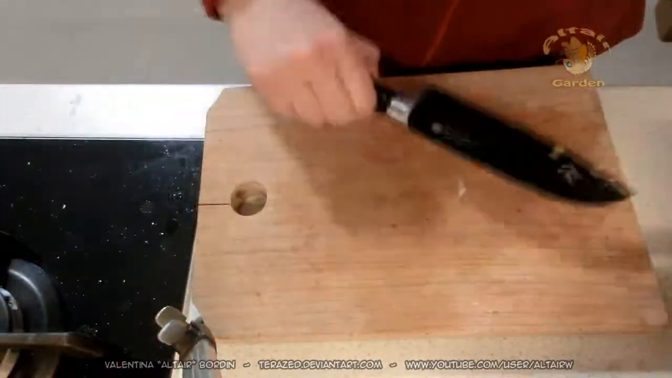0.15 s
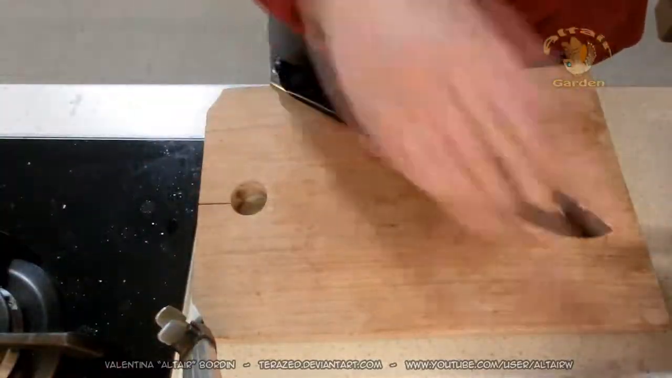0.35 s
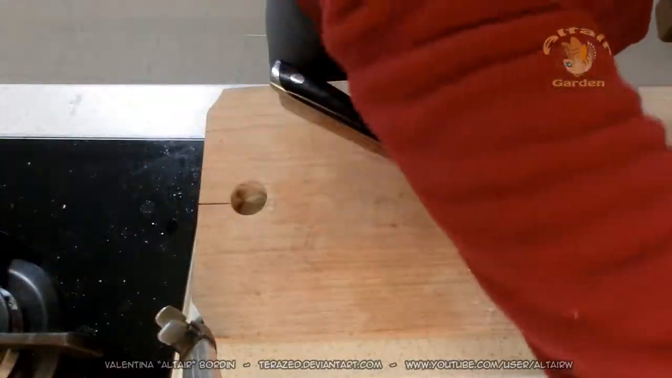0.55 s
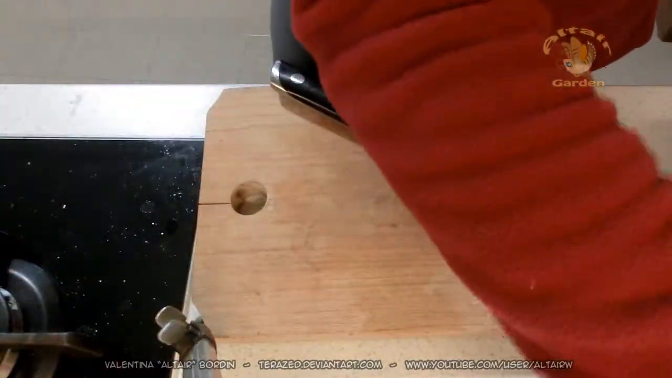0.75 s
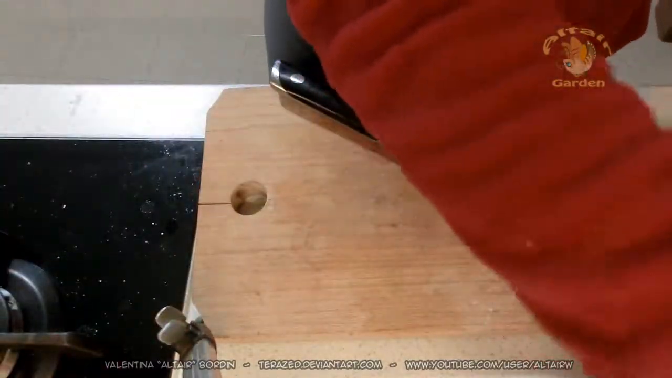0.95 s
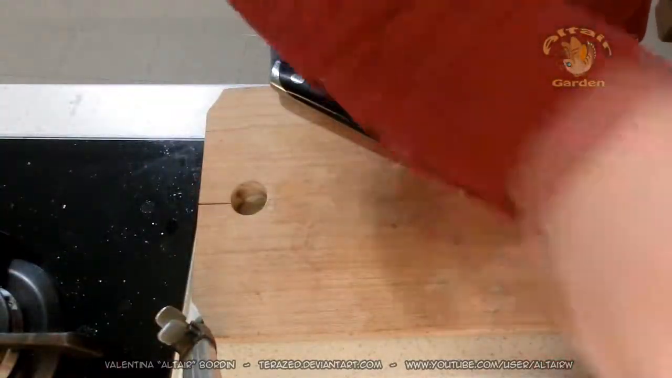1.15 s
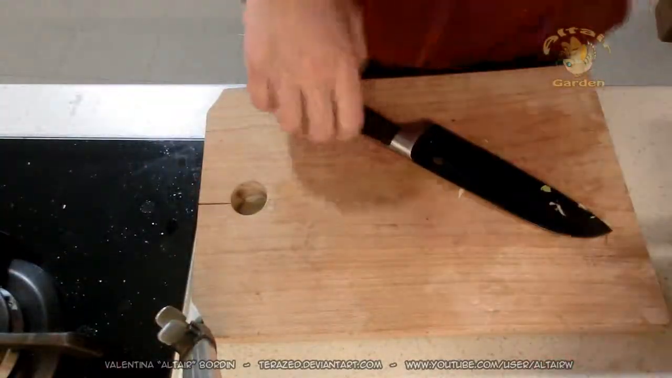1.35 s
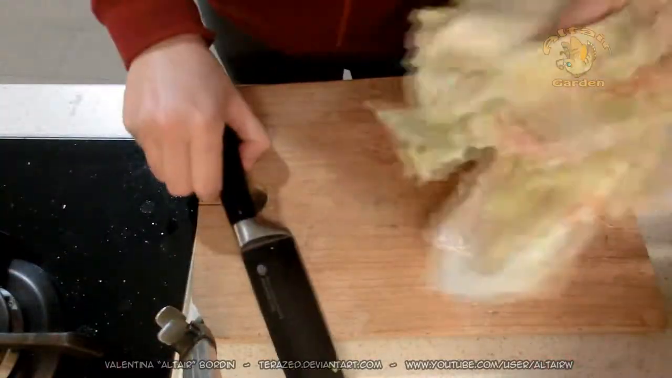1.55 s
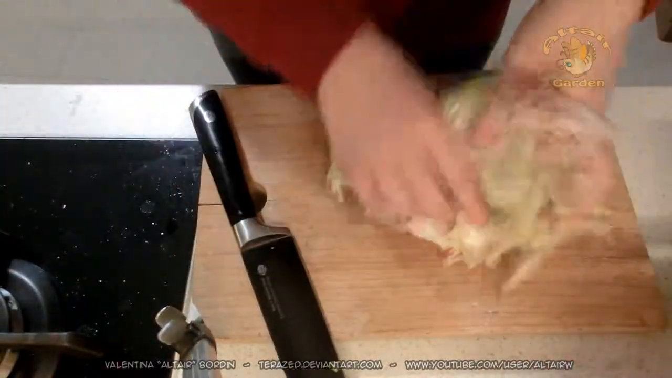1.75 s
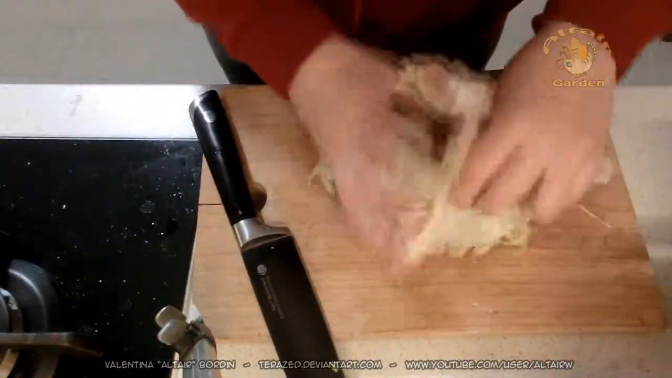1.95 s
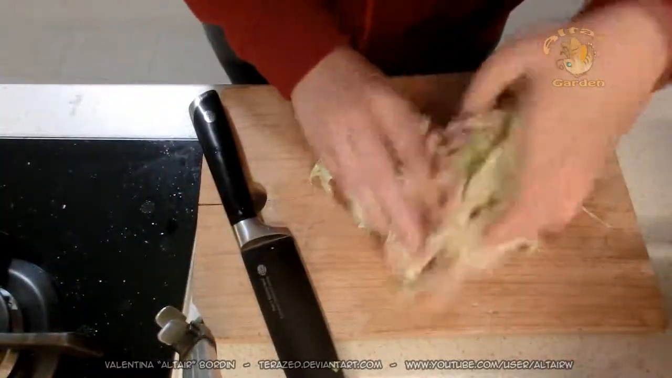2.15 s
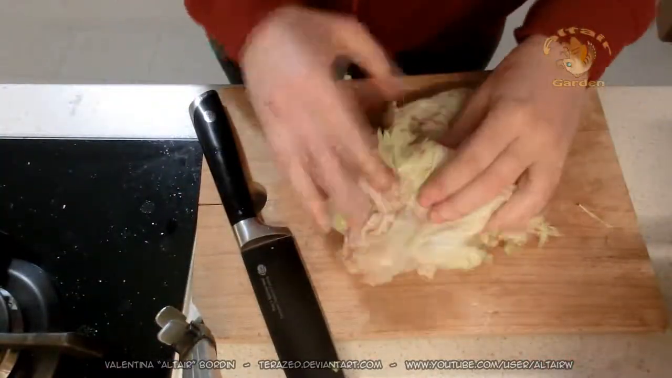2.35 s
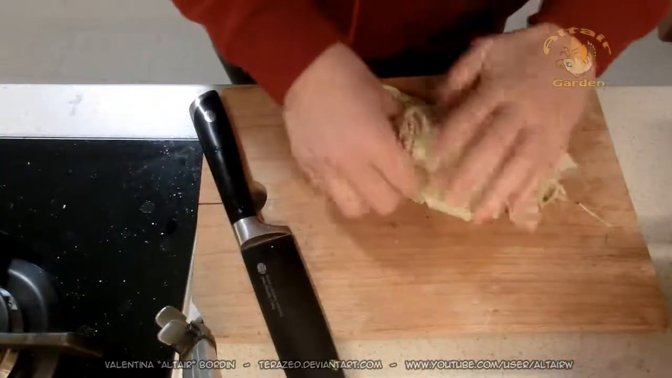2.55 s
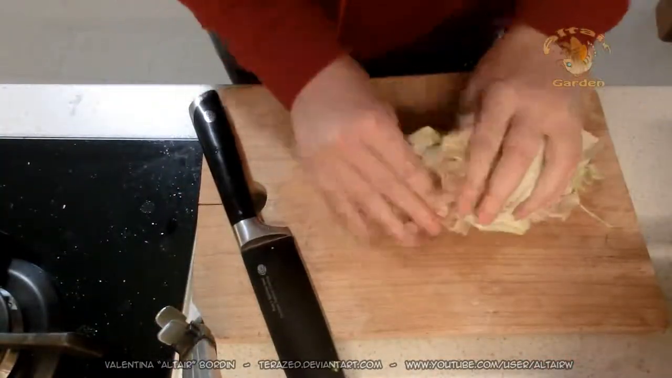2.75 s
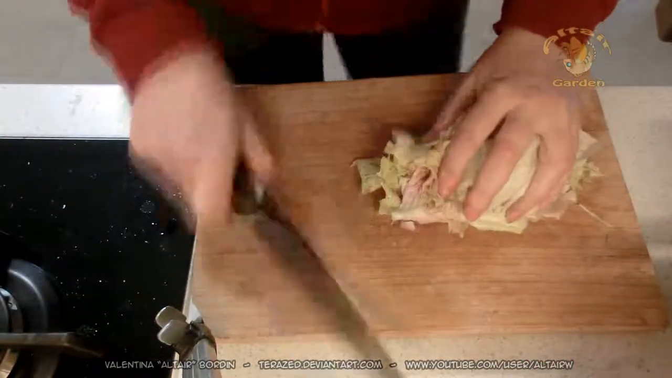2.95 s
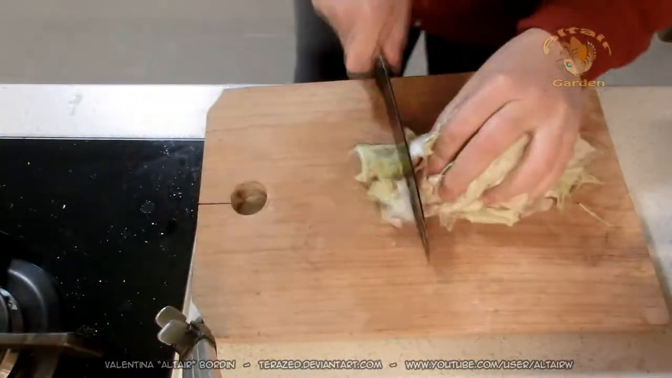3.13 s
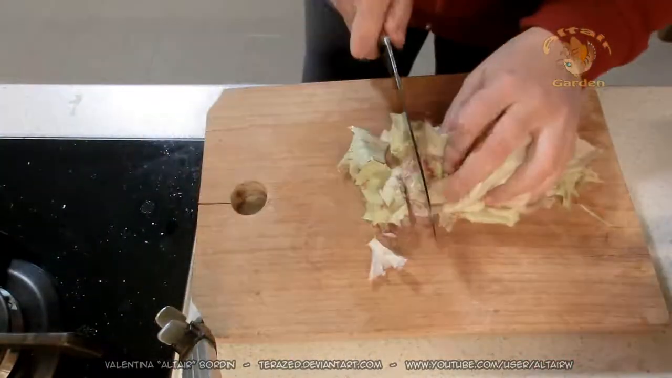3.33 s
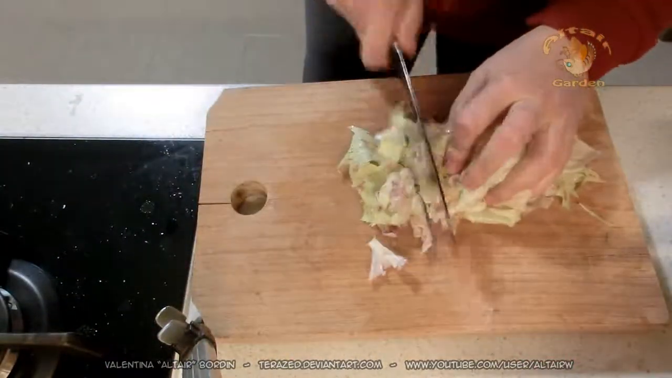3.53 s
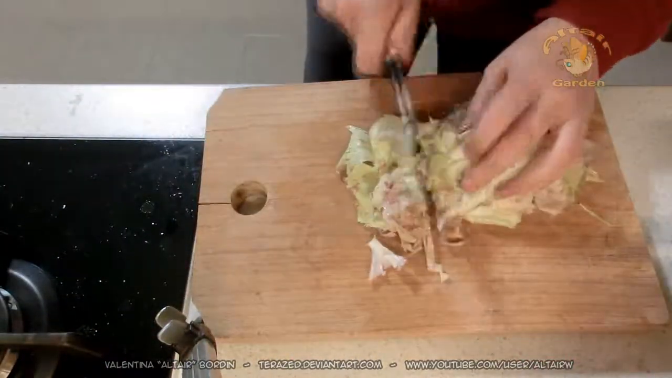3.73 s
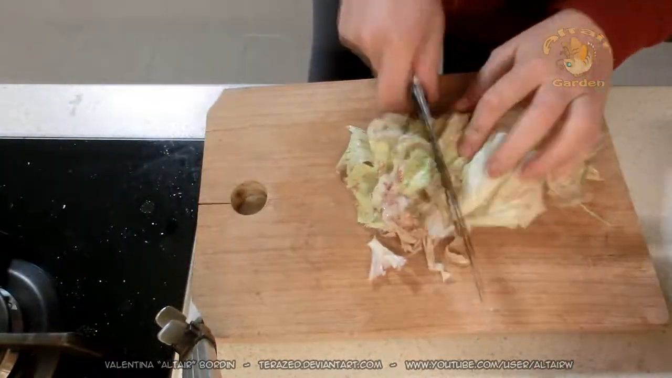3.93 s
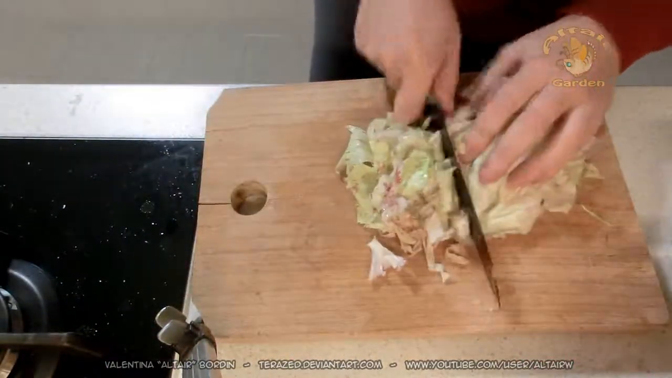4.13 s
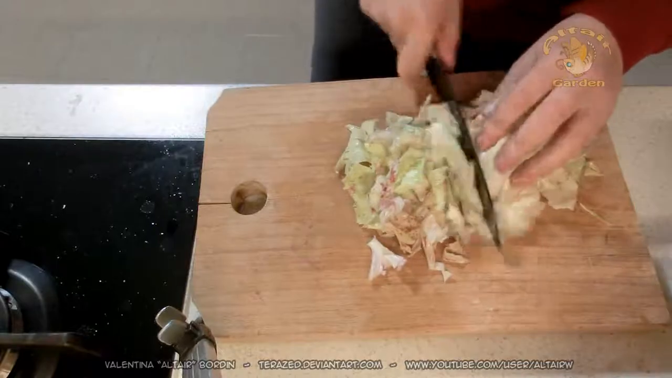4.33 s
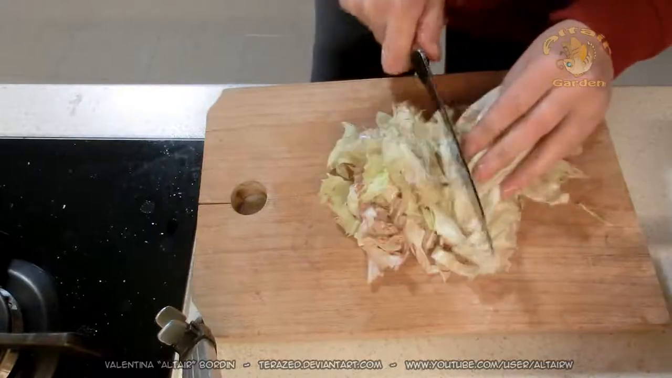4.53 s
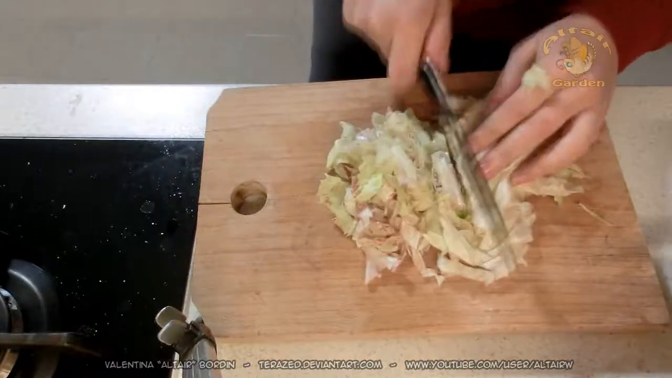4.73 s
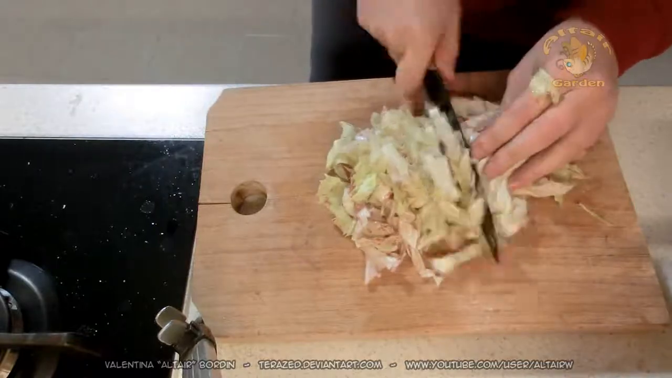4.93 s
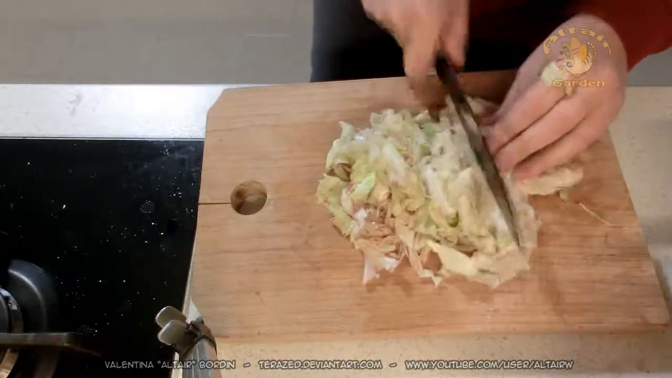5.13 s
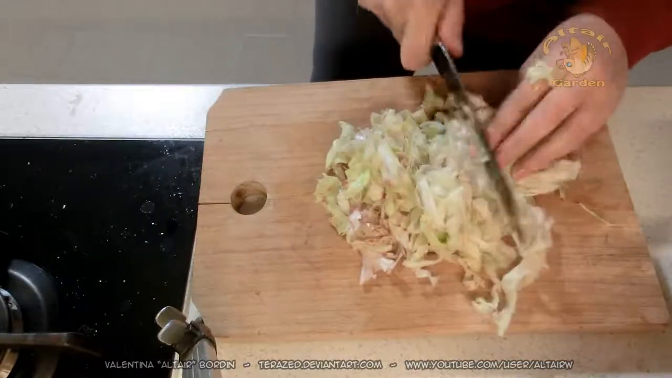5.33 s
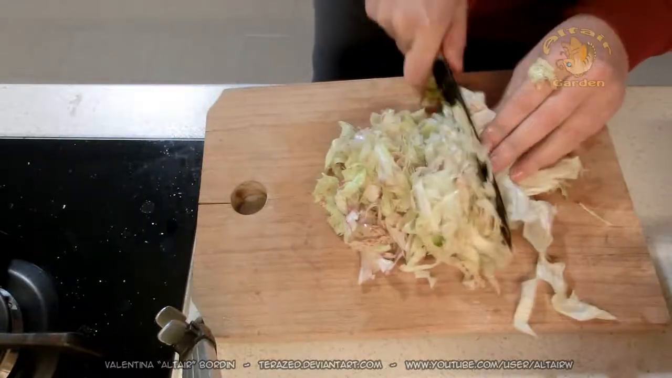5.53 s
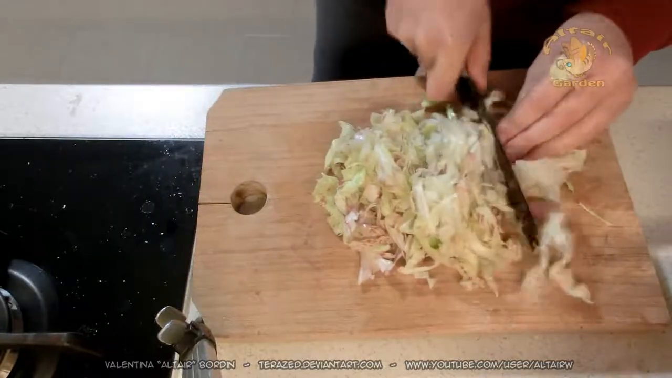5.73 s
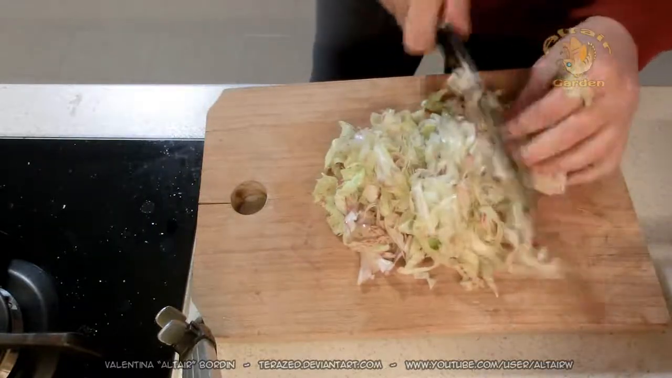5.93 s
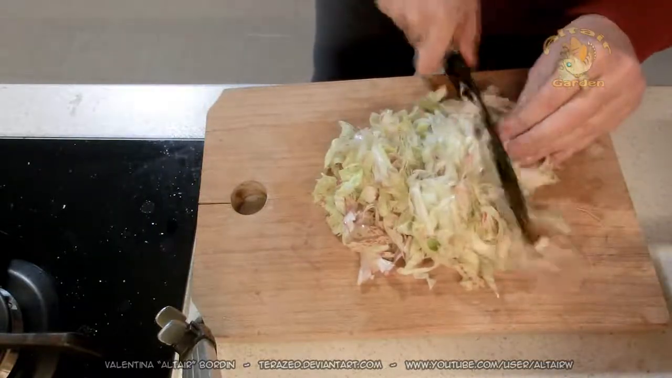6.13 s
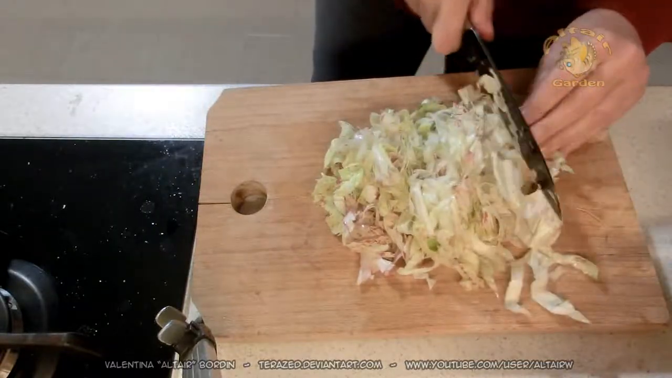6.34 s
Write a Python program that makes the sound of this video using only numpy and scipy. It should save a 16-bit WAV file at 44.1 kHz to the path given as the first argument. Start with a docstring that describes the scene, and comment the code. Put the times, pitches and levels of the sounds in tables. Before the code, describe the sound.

Sleeve rustle, knife clinks and crisp leaf-bunching lead into steady cabbage shredding, each crunchy cut ending in a dull wooden knock, close in a quiet kitchen.

```python
"""A kitchen knife shreds cabbage in a dozen strokes: swarms of snapping fibres also ring the wooden board,
and each stroke adds a dull knock with a softer settling, and a short stick-slip scrape of the edge.
Before that the cook moves the knife aside (brushed handle, knocks from short pushes, ringing blade modes),
reaches for leaves (sleeve noise) and bunches them up (crackling grains); single ribs snap as filtered noise.
Close stereo microphone in a small, quiet kitchen: soft coloured noise, a faint whirr and a short tail."""
import sys
import numpy as np
from scipy import signal
from scipy.fft import rfft, irfft
from scipy.io import wavfile
from scipy.ndimage import uniform_filter1d

SR = 44100
rng = np.random.default_rng(int(sys.argv[2]) if len(sys.argv) > 2 else 0)


def dump(signal):
    """Clip the signal to [-1, 1] and save it as 16-bit WAV at the path in sys.argv[1]."""
    limited = np.clip(np.atleast_2d(signal).T, -1, 1)
    pcm = np.round(limited * 32767).astype(np.int16)
    wavfile.write(sys.argv[1], SR, pcm)


N = 285672
TIME = np.arange(N) / SR
SHORT = TIME[:SR // 5]  # 0.2 s
SWELL_SAMPLES = np.arange(-len(SHORT), 2 * len(SHORT))  # around the event at 0


def undb(db):
    """Decibels to gain."""
    return 10 ** (np.asarray(db) / 20)


def unit(x):
    """Scale to rms 1."""
    return x / np.sqrt(np.mean(x ** 2))


def peak(x, db):
    """Scale to a peak level."""
    return undb(db) * x / np.abs(x).max()


def ring(x, response):
    """Play x through an impulse response scaled to unit energy."""
    return signal.fftconvolve(x, response / np.linalg.norm(response))[:len(x)]


def gains(points, size):
    """A (f/Hz, level/dB) spectrum as gains on the bins of a transform."""
    hz, db = np.transpose(points)
    log_bins = np.log(np.fft.rfftfreq(size, 1 / SR) + 1)
    return undb(np.interp(log_bins, np.log(hz), db))


def colour(x, points):
    """Filter x by a (f/Hz, level/dB) spectrum."""
    return irfft(rfft(x) * gains(points, len(x)), len(x))


def decay(t, t60):
    """Exponential decay by 60 dB in t60 seconds."""
    return np.exp(-np.log(1000) * t / t60)


def modes(table, t=SHORT):
    """Impulse response of decaying modes (f/Hz, level/dB, t60/s); neighbours swing in opposite directions."""
    response = np.zeros(len(t))
    for k, (hz, db, t60) in enumerate(table):
        response += (-1) ** k * undb(db) * np.sin(2 * np.pi * hz * t) * decay(t, t60)
    return response


def add(out, s, sound):
    """Mix a sound in at time s."""
    i = int(s * SR)
    out[i:i + len(sound)] += sound[:N - i]


def swell(rise, fall, hold=0.):
    """Exponential rise to 1 at the event, a hold, and an exponential fall; times in s, rise and fall per e-fold."""
    t = SWELL_SAMPLES / SR
    return np.exp(np.minimum(t, 0) / rise - np.maximum(t - hold, 0) / fall)


def stretch(x, s):
    """The short stretch of x that a swell at time s covers."""
    return np.take(x, int(s * SR) + SWELL_SAMPLES, mode="wrap")


def walk(rate):
    """Smooth random wander with a spread near 1, drawing `rate` new values a second."""
    k = int(SR / rate)
    steps = np.repeat(rng.standard_normal(N // k + 1), k)
    return unit(uniform_filter1d(steps, k)[:N])


def grains(rate, spread_db):
    """Random tiny fractures, `rate` a second on average, most weak and a few strong; rms 1."""
    size = undb(spread_db * np.minimum(rng.exponential(size=N), 4))
    happens = rng.random(N) < rate / SR
    return unit(happens * size * rng.choice([-1, 1], N))


def patchy(x, spread_db):
    """Every scrap of leaf rings at pitches of its own, so the colour shifts from moment to moment; rms 1."""
    z = signal.stft(x, nperseg=512)[2]
    across_pitch = uniform_filter1d(rng.standard_normal(z.shape), size=6, axis=0)
    patches = uniform_filter1d(across_pitch, size=4, axis=1)
    return unit(signal.istft(z * undb(spread_db * unit(patches)))[1][:len(x)])


# soft room noise spectrum: f/Hz, level/dB
KITCHEN_SPECTRUM = [(12, -26), (20, 0.5), (95, 1), (274, -10), (333, -7), (505, -11.5), (581, -11),
                    (667, -3.5), (746, -18.5), (932, -9), (1200, -13), (1920, -9.5), (2270, -11.5),
                    (3640, -12), (11000, -22.5), (15500, -27.5)]
HISS_DB = -59.5  # rms, before the slow waver


def kitchen():
    """Steady soft room noise with an appliance's faint whirr: noise ringing one short resonance."""
    hiss = unit(colour(rng.standard_normal(N), KITCHEN_SPECTRUM)) * undb(.5 * walk(8))
    whirr = ring(rng.standard_normal(N), modes([(673, 0, 0.045)]))
    return undb(HISS_DB) * hiss + undb(-88) * whirr


ROOM_T60_S = 0.19


def room(x):
    """Nearby walls and cupboards give a short tail, duller than the direct sound."""
    t = TIME[:SR // 2]
    tail = rng.standard_normal(len(t)) * decay(t, ROOM_T60_S) * (t > .008)
    tail_colour = [(100, 3), (500, 2.5), (2000, -6.5), (5000, -0.5), (14000, -18)]
    return x + undb(-10) * colour(ring(x, tail), tail_colour)


# sleeve cloth spectrum: f/Hz, level/dB
SLEEVE_SPECTRUM = [(29, -37), (50, -4.5), (124, -15.5), (211, -9.5), (268, -14), (358, -2.5), (434, -16.5),
                   (501, -10.5), (701, -14), (829, -9), (1080, -12.5), (1880, -9.5), (3850, -18),
                   (9590, -23), (15500, -30)]
# reaching past the microphone for the leaves, as a contour: t/s, level/dB
REACH_CONTOUR = [(0.53, -86), (0.582, -55.5), (0.65, -51), (0.664, -43.5), (0.674, -49), (0.83, -43.5),
                 (0.872, -54.5), (1.19, -53), (1.214, -63.5), (1.3, -63)]


def reaching():
    """The sleeve brushes by: many tiny cloth grains, wavering in strength."""
    rub = colour(grains(rate=7000, spread_db=2.8), SLEEVE_SPECTRUM) * undb(1.4 * walk(110))
    s, db = np.transpose(REACH_CONTOUR)
    return unit(rub) * np.interp(TIME, s, undb(db), left=0, right=0)


# the hand brushing the knife handle and the board: t/s at the peak, level/dB, rise and fall/s
BRUSH_EVENTS = [(0.293, -53, 0.027), (.425, -58, 0.011)]


def brushing():
    """Dry skin slides over a smooth surface with a light hiss."""
    out = np.zeros(N)
    skin = [(500, 6), (2000, 3.5), (6000, -3), (10000, -3), (15000, -9)]
    hiss = unit(colour(rng.standard_normal(N), skin))
    for s, db, width in BRUSH_EVENTS:
        add(out, s - SHORT[-1], undb(db) * swell(width, width) * stretch(hiss, s))
    return out


# the steel blade's modes, before slight detuning: f/Hz, level/dB, t60/s
BLADE_MODES = [(1880, -11, 0.26), (2660, -8, 0.28), (3040, -1, 0.094), (3150, -7, 0.054), (3750, -13, 0.71),
               (5020, -15, .12), (6030, -12, .13), (7230, -15, 0.2)]
# the blade jarred as the knife is laid down: t/s, level/dB (ring and chatter are set around it)
CLINK_EVENTS = [(.345, -54.5), (1.49, -42), (1.501, -39.5), (1.52, -44.5), (1.603, -50)]


def clinks():
    """The blade chatters for a moment on the wood and rings on, bent slightly out of tune by each contact."""
    out, t = np.zeros(N), TIME[:SR // 2]
    for s, db in CLINK_EVENTS:
        bent = [(hz * (1 + 0.0045 * rng.standard_normal()), mode_db, t60) for hz, mode_db, t60 in BLADE_MODES]
        burst = rng.standard_normal(len(t)) * np.exp(-t / 0.012)
        chatter = colour(burst, [(500, 8.5), (3000, 8), (5000, -7), (12000, -9)])
        add(out, s, peak(modes(bent, t), db - 0.5) + peak(chatter, db + 2.5))
    return out


# the board on the counter, before each contact varies it: f/Hz, level/dB, t60/s
BOARD_MODES = [(52.3, -11, 0.33), (68, 4, 0.055), (101.6, 7.5, 0.066), (162.6, -5, 0.071), (227, -6, 0.064),
               (297.4, -6, 0.052), (546.4, -8, 0.069), (633, -10.5, 0.055), (1002, -5.5, 0.026),
               (1327, -4, 0.03), (1564, -0.5, 0.015), (1880, -31, 0.032), (2410, -6, 0.024),
               (2480, -5, 0.02)]
# the board's countless weaker modes, one short woody burst: f/Hz, level/dB
WOOD_SPECTRUM = [(250, -21), (450, -16), (560, 2), (900, -1.5), (1700, -0.5), (2400, -7), (3800, -25),
                 (12000, -29)]
WOOD_DB, WOOD_T60_S = -0.5, .045


def board(vary_db=0.0, detune=0.033):
    """The board's ring; each spot and each press of the hand weights and shifts the upper modes anew."""
    hz, db, t60 = np.transpose(BOARD_MODES)
    weight, shift = rng.standard_normal((2, len(hz))) * np.minimum(hz / 500, 1)
    wood = unit(colour(rng.standard_normal(len(SHORT)), WOOD_SPECTRUM)) * decay(SHORT, WOOD_T60_S)
    main_modes = modes(zip(hz * (1 + detune * shift), db + vary_db * weight, t60))
    return main_modes + undb(WOOD_DB) * wood


PUSH_LEAD_S = .005  # from the start of a knock to the middle of its push


def knock(out_db, contact_ms):
    """A push, a rebound and a little chatter drive the board; shorter contacts reach higher modes."""
    u = (SHORT - PUSH_LEAD_S) * 1000 / contact_ms
    push = u * np.exp(-u ** 2 / 2)
    rattle = rng.standard_normal(len(SHORT)) * np.exp(-SHORT / 0.007)
    chatter = peak(ring(push, rattle), -10.5)
    return peak(ring(push + chatter, board()), out_db)


# handle, hands and heel of the knife bumping the board:
# t/s, peak level/dB before the layer trim, contact time scale/ms (short is hard)
KNOCK_EVENTS = [(0.288, -41.5, 0.57), (.324, -32.5, 0.94), (.33, -46, 0.13), (0.3412, -34, 0.64),
                (0.3418, -37.5, .13), (1.445, -45.5, 1.5), (1.480, -33.5, 0.9), (1.498, -40.5, 0.62),
                (1.605, -40, 0.11), (1.612, -40, 0.62), (1.635, -36, 0.65), (1.657, -42, 0.23),
                (1.663, -31.5, 0.64), (1.955, -40.5, 1.5), (2.007, -41.5, 1.2), (2.526, -42.5, 1.2),
                (2.602, -45.5, 0.83), (2.985, -48.5, 1), (3.491, -23, 0.12), (3.4924, -24.5, 0.2),
                (4.248, -44, 0.97), (4.456, -30, 0.21), (4.471, -29.5, 0.83), (4.49, -32, 2),
                (4.713, -33.5, 1.63), (5.096, -39.5, 1.04), (5.367, -31.5, 0.78), (5.380, -29.5, 1.6),
                (5.574, -29.5, 0.27), (5.862, -47, 1.4), (6.226, -37, 0.69)]
SETTLE_S, SETTLE_DB = .028, -16  # the knife settles once more: delay after the thud, level relative to it


def knocks():
    """Each stroke ends in a thud and a softer settling; hands and knife also bump the board."""
    out = np.zeros(N)
    for s, _, _, _, delay, db, contact_ms, _, _ in STROKE_EVENTS:
        lands = s + delay - PUSH_LEAD_S
        add(out, lands, knock(db, contact_ms))
        add(out, lands + SETTLE_S, knock(db + SETTLE_DB, contact_ms))
    for s, db, contact_ms in KNOCK_EVENTS:
        add(out, s - PUSH_LEAD_S, knock(db, contact_ms))
    return undb(-.5) * out


# thin leaf, bright (also snapped and cut below): f/Hz, level/dB
LEAF_SPECTRUM = [(200, -31), (700, -5), (2000, -10), (3200, -2.5), (5000, 6), (7500, 3.5), (10500, 4),
                 (13000, -0.5), (15500, -7.5)]
# thick rib, lower (also snapped and cut below): f/Hz, level/dB
RIB_SPECTRUM = [(100, 6.5), (380, -10.5), (550, 9), (780, -8), (1100, 9.5), (1800, 1.5), (2600, 4.5),
                (4000, -4.5), (6000, -25), (15000, -51)]
# leaves squeezed together on the board, as contours before the layer trims:
# t/s, bright crackle level/dB, lower creak level/dB
BUNCHING_CONTOUR = [(1.7, -77, -81), (1.736, -59, -61.5), (1.852, -53.5, -49.5), (1.988, -58.5, -58.5),
                    (2.004, -51.5, -45.5), (2.048, -61, -53), (2.116, -48.5, -56.5), (2.164, -77, -82),
                    (2.2, -44, -50), (2.236, -49, -59.5), (2.34, -49, -48), (2.47, -61.5, -59.5),
                    (2.586, -40, -48), (2.662, -68, -58.5), (2.698, -54, -49), (2.742, -67, -69),
                    (2.806, -50.5, -58), (2.886, -63.5, -70), (2.906, -45.5, -55), (2.978, -73.5, -78),
                    (3.11, -60, -62), (3.14, -71, -76)]


def bunching():
    """Squeezed leaves crackle in small fits; thick ribs creak lower and rub on the board."""
    crackle = unit(grains(rate=2600, spread_db=2.0) * undb(2.24 * walk(150)))
    crisp = patchy(colour(crackle, LEAF_SPECTRUM), spread_db=3.0)
    rib_creak = unit(colour(crackle, RIB_SPECTRUM))
    creak = undb(-2.0) * rib_creak + undb(-8.5) * ring(crackle, board())
    s, crisp_db, creak_db = np.transpose(BUNCHING_CONTOUR)
    active = (TIME > s[0]) * (TIME < s[-1])
    crisp_level = undb(np.interp(TIME, s, crisp_db)) * active
    creak_level = undb(np.interp(TIME, s, creak_db)) * active
    return undb(-1.0) * crisp_level * crisp + undb(2.5) * creak_level * creak


# single leaf ribs snapping:
# t/s, peak level/dB, lower body level/dB before peak scaling, f/Hz on which the bright crack is centred
SNAP_EVENTS = [(0.6343, -38, -7, 4300), (0.6625, -32, -3, 4000), (0.7051, -34.5, 4, 9000),
               (2.069, -28.5, 16, 3500), (2.195, -33.5, 4, 4500), (2.5549, -27, -9, 6700),
               (2.791, -30, -20, 7400), (2.9014, -42, -20, 5500), (3.1553, -36, -19.5, 6050),
               (3.423, -33, -5, 5000), (4.125, -40, -7, 5000), (6.0317, -43.5, -19, 6360),
               (6.1853, -35, -7, 5000), (6.4577, -35, -13, 4280)]
SNAP_SKIRT_DB = -11  # gain half an octave off the centre and beyond


def snaps():
    """A rib breaks with one sharp crack and a brief splintering; thick ribs sound lower."""
    out = np.zeros(N)
    for s, db, body_db, hz in SNAP_EVENTS:
        crack_and_splinter = np.exp(-SHORT / .0012) + .15 * np.exp(-SHORT / .008)
        crack = rng.standard_normal(len(SHORT)) * crack_and_splinter
        crack = np.pad(crack, (len(SHORT), 0))  # silence ahead, room for the filters
        band = [(hz / np.sqrt(2), SNAP_SKIRT_DB), (hz, 0), (hz * np.sqrt(2), SNAP_SKIRT_DB)]
        bright = colour(colour(crack, LEAF_SPECTRUM), band)
        body = undb(body_db) * colour(crack, RIB_SPECTRUM)
        add(out, s - SHORT[-1], peak(bright + body, db))
    return out


SLIDE_RISE_S, SLIDE_FALL_S = .012, 0.015


def sliding():
    """After the cut the edge sticks and slips along the grain: a soft scrape that also rings the board."""
    out = np.zeros(N)
    edge = [(60, -6.5), (500, -9.5), (1200, -1.0), (1800, -.5), (3500, -5.0), (7000, -11.0), (15000, -17.0)]
    slips = unit(colour(grains(rate=4000, spread_db=4.0), edge))
    for s, cut_length, *_, length, db in STROKE_EVENTS:
        start = s + cut_length
        scrape = stretch(slips, start) * undb(db) * swell(SLIDE_RISE_S, SLIDE_FALL_S, length)
        wood = ring(scrape, board(vary_db=3.5, detune=.08))
        add(out, start - SHORT[-1], undb(-5.0) * wood + undb(-2.0) * scrape)
    return out


# knife strokes, also played by knocks and sliding; levels before the layer trims:
# t/s the blade is in the leaves, cut length/s, crunch level/dB, lower body level/dB relative to the crunch,
# delay/s from t until it meets the board, thud peak level/dB, contact time scale/ms (short is hard),
# slide length/s, slide level/dB
STROKE_EVENTS = [(3.22, 0.015, -37.5, -10, .001, -32.5, 1.4, 0.073, -51.5),
                 (3.472, 0.012, -38, -6.5, 0.005, -33.5, 1.7, 0.041, -53.5),
                 (3.662, 0.044, -44.5, -3, .03, -31, 1.14, .055, -51.5),
                 (3.895, 0.05, -44, -0.5, .042, -34.5, 0.71, .048, -51.5),
                 (4.137, 0.037, -45, 1, .03, -32, 1.15, 0.051, -49),
                 (4.375, 0.055, -42.5, -1, .015, -33.5, 0.95, 0.11, -52.5),
                 (4.680, 0.039, -44.5, 2, .001, -31.5, 2.1, 0.055, -48),
                 (4.977, 0.019, -41, 2, .012, -29.5, 1.13, 0.073, -48),
                 (5.245, 0.038, -44, 3, .048, -30.5, 1.3, 0.055, -47),
                 (5.57, 0.0038, -40.5, 6, .014, -23.5, 1.8, 0.092, -57),
                 (5.819, 0.0066, -39, 3, .001, -32.5, 1.14, 0.073, -54.5),
                 (6.206, 0.011, -44, 0.5, .001, -32.5, 0.82, 0.056, -51)]
# the leaves give way, the crunch dies; its strength wavers (rms)
CUT_RISE_S, CUT_FALL_S, CUT_WAVER_DB = 0.0088, .016, 1.38
PRESS_S, PRESS_DB = 0.042, -12  # the blade first presses lightly on the outer leaves; level relative to the crunch


def cutting():
    """Fibres burst in clusters under the blade: thin leaf bright, thick ribs lower, and the board rasps along."""
    out = np.zeros(N)
    bursts = unit(grains(rate=13000, spread_db=1.8) * undb(1.2 * walk(250)))
    crunch = patchy(colour(bursts, LEAF_SPECTRUM), spread_db=2.5)
    ribs = unit(colour(bursts, RIB_SPECTRUM))
    layers = undb(CUT_WAVER_DB * walk(60))
    for s, length, db, body_db, *_ in STROKE_EVENTS:
        force = undb(db) * swell(CUT_RISE_S, CUT_FALL_S, length) * stretch(layers, s)
        press = undb(db + PRESS_DB) * swell(PRESS_S, CUT_FALL_S)
        rasp = ring(stretch(bursts, s) * force, board(vary_db=1.5, detune=0.063))
        body = undb(2.0) * rasp + undb(-2.5) * stretch(ribs, s) * force
        bright = undb(-1.0) * stretch(crunch, s) * np.maximum(force, press)
        add(out, s - SHORT[-1], bright + undb(body_db) * body)
    return out


# the microphone pair's lean: f/Hz, left minus right level/dB
LEAN_SPECTRUM = [(100, 2.3), (2000, 2), (4000, 1.5), (6000, 4), (8000, 9), (13000, 13.5)]
# sound scattered differently to left and right: f/Hz, level/dB
SCATTER_SPECTRUM = [(100, -22), (700, -22), (2000, -15.5), (4000, -9.5), (8000, -8), (14000, -6.5)]
KITCHEN_SIDE_DB = -8.5  # the room noise that differs between left and right


def scene():
    """The treble leans left and flickers in direction, coming from ever different spots; room noise surrounds."""
    preparing = reaching() + brushing() + clinks() + bunching() + snaps()
    chopping = knocks() + sliding() + cutting()
    mid = room(preparing + chopping) + kitchen()
    side = colour(mid, SCATTER_SPECTRUM) * walk(600) + undb(KITCHEN_SIDE_DB) * kitchen()
    right = irfft(rfft(mid) * 2 / (1 + gains(LEAN_SPECTRUM, N)), N)
    left = 2 * mid - right
    return np.array([left + side, right - side])


TOP_HZ = 15500


def record(dry):
    """The recorder cuts the top with a steep elliptic low-pass."""
    low_pass = signal.ellip(10, .2, 70, TOP_HZ, fs=SR, output="sos")
    return signal.sosfilt(low_pass, dry)


dry = scene()
out = record(dry)
dump(out)
```